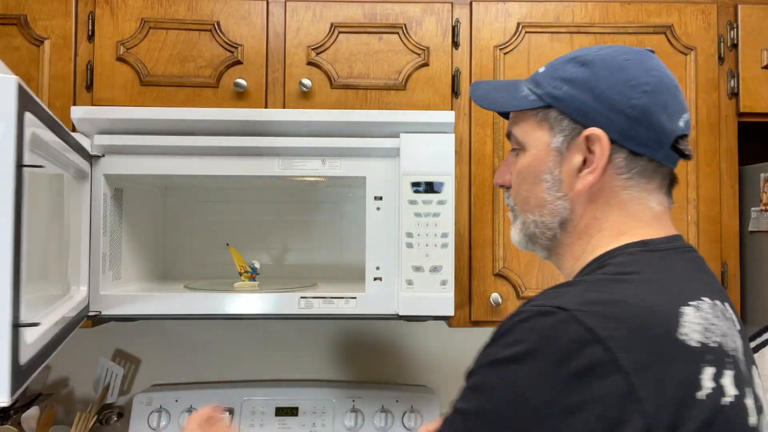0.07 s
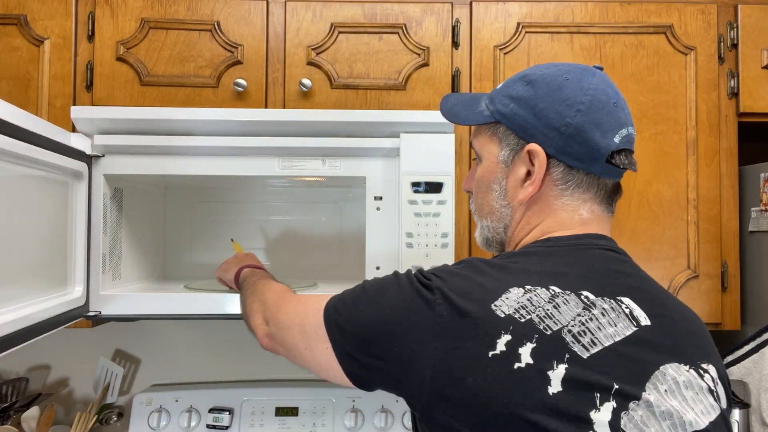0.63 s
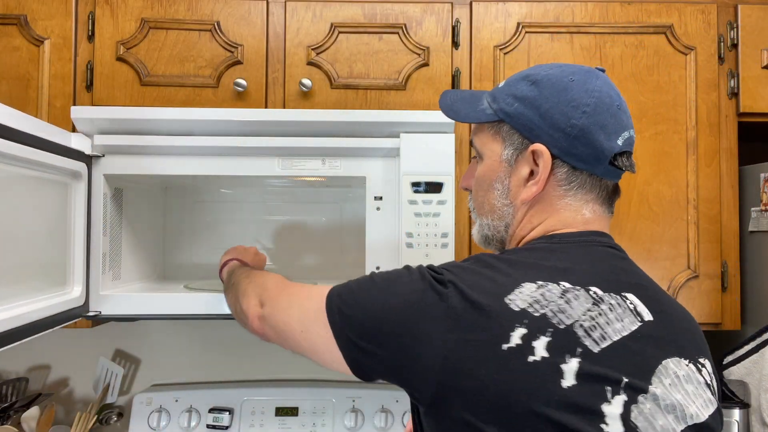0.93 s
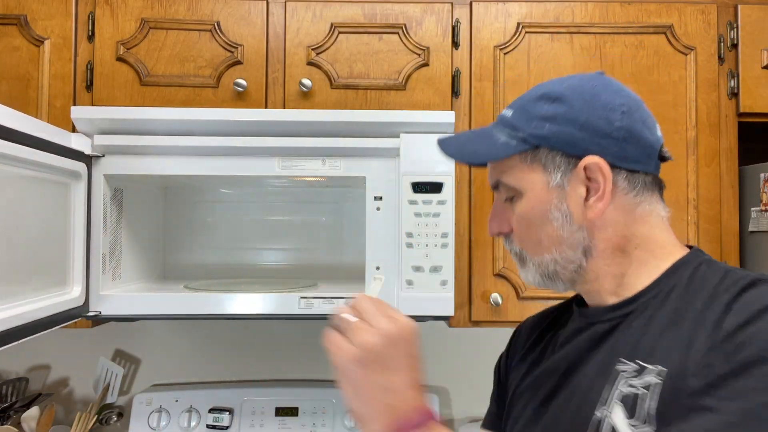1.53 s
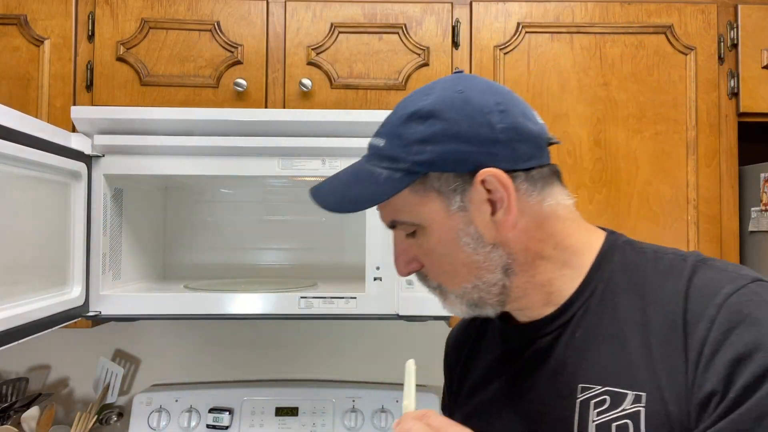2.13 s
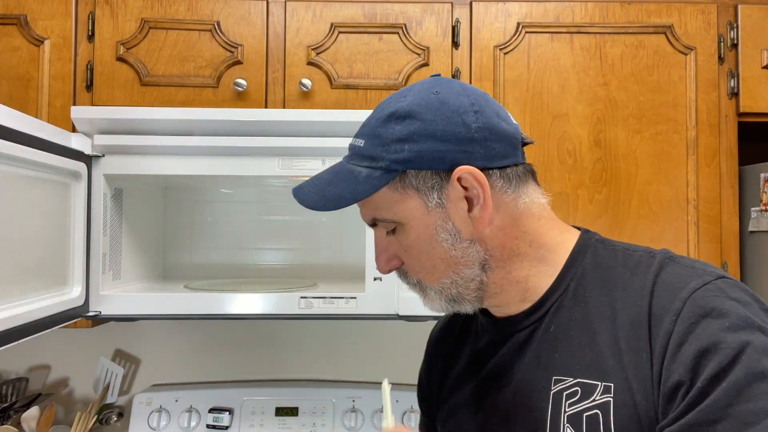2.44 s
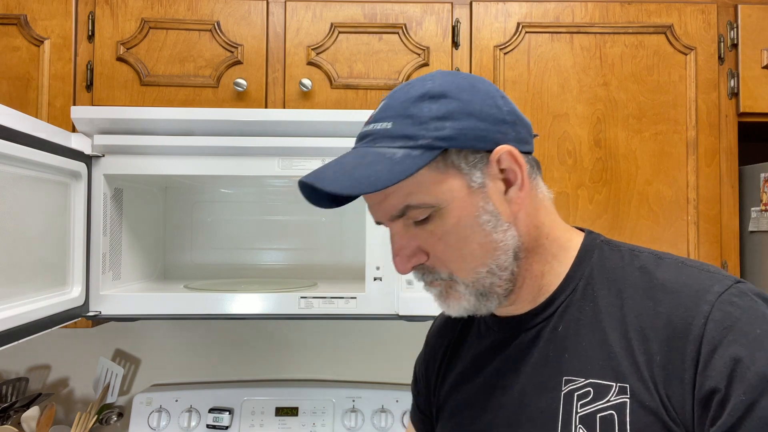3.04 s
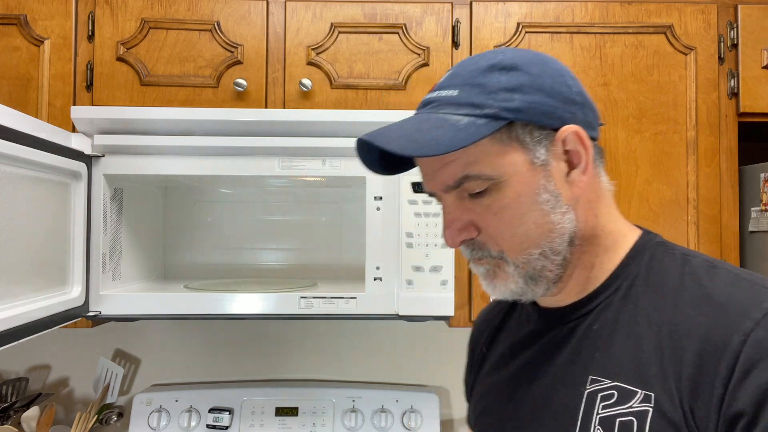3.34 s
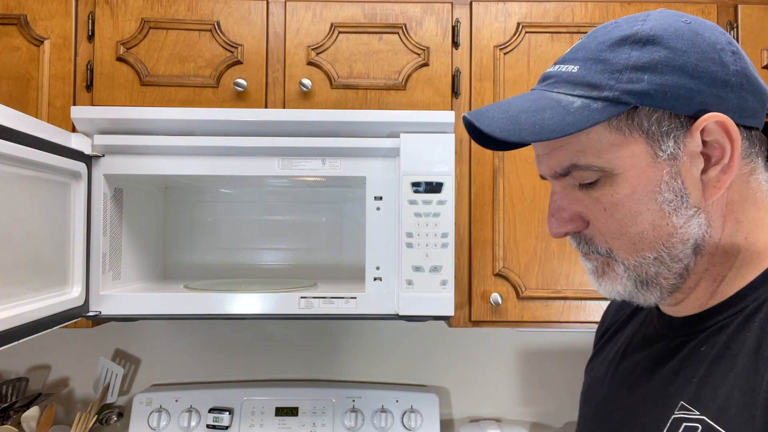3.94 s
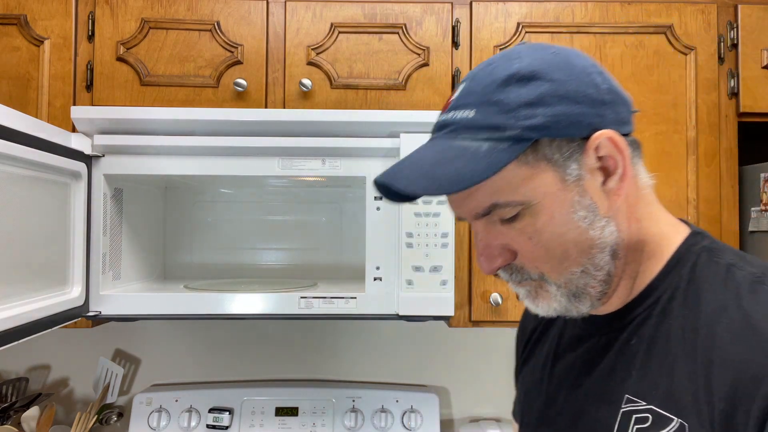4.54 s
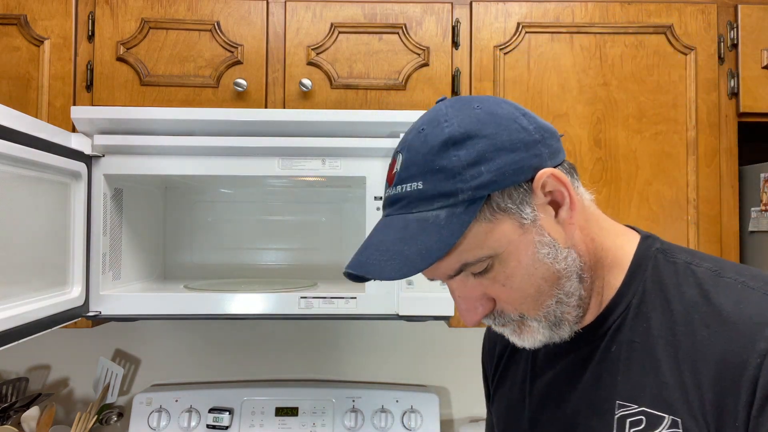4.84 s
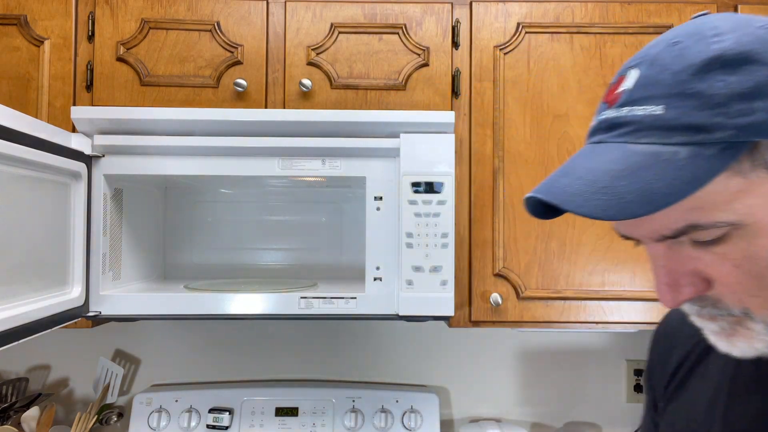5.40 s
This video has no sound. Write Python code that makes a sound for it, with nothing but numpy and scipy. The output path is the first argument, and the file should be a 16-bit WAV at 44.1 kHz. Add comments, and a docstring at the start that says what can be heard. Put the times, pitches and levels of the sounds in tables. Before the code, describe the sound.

A sleeve rustles at the start, over the faint hum of an appliance in a quiet kitchen. From about 0.5 seconds a small toy figure scrapes and nudges the glass turntable of an open microwave, with a tiny squeak near 0.8. At 1.1 the plate drops back with a sharp clink and rings on, one wavering tone fading over the next couple of seconds. The toy clacks sharply in the hand at about 1.45. Soft, hollow plastic taps with a slight hoot come around 1.7 and again from 2.6 to 2.9. After a lull, something snaps down on the counter at 4.1 and thumps the cabinets. A firm knock follows at 4.4, with a short clatter until 4.6. A few faint bumps and ticks and a light cloth rustle continue to about 5.5 seconds. Everything sounds close, with a little room echo.

```python
"""The glass turntable of an open microwave oven clinks and rings on as a small toy figure is pulled off it.
The figure's base scrapes, squeaks and nudges the plate until it drops back on its rollers, its paired
modes beating. The toy clacks in the hand, a hollow plastic thing is tapped, then things are put down
on the counter with a sharp snap and a few knocks that thump the cabinets. A sleeve rustles and an
appliance hums in the quiet kitchen."""
import sys
import numpy as np
from scipy import signal
from scipy.fft import rfft, irfft
from scipy.io import wavfile
from scipy.ndimage import uniform_filter1d

SR = 44100
rng = np.random.default_rng(int(sys.argv[2]) if len(sys.argv) > 2 else 0)


def wav_out(sig):
    """Save sig, one row per channel (or a flat mono array), as 16-bit PCM at SR to the path in sys.argv[1]."""
    wavfile.write(sys.argv[1], SR, np.round(np.clip(np.atleast_2d(sig).T, -1, 1) * 32767).astype(np.int16))


N = 245537

# modes of the glass plate: (frequency [Hz], clash level [dB], ring level [dB], ring t60 [s],
# beat of the pair [Hz], pan left [dB], lift under the hand [dB], left phase lead [rad])
PLATE_MODES = [(381.3, -21, -18.5, 0.42, 2.5, 8.5, 5.5, -0.3),
               (440, -37.5, -36, 0.81, 7.1, -2.5, -1.5, 0.5), (560, -25.5, -29, 0.67, 5.8, 2, -1.5, 1.9),
               (893, -26, -27.5, 3.56, 1.1, -1, 5.5, .5), (1125, -33, -29.5, 0.84, 13, -7, 2.5, 2.5),
               (1174, -18.5, -38, .45, 9, 4.5, 1, 7), (1260.4, -17.5, -34.5, 1.5, 40, 12.5, 13.5, -7),
               (1623, -17.5, -27, 0.69, 18, -3, -4.5, -0.5), (1860, -33.5, -42, .3, 10, 0.5, -2.5, 0),
               (2167, -32.5, -18, .52, 8.6, 1, 12, 0.5), (2295, -33, -36.5, .42, 14, -4, 16, 2.2),
               (2478, -22, -28, 0.57, 7.8, -2.5, 1, 0.8), (2700, -33, -39, .4, 13, -5.5, -1.5, 4),
               (3268, -23.5, -37, .3, 13, -2.5, 13, -2), (3544, -22.5, -46, 0.19, 17, 0.5, 11.5, 9),
               (4440, -50, -45, .45, 13, 0, 0, -1), (4630, -34.5, -41.5, 0.43, 18, -5, 7, 4.5),
               (5106, -41, -52, .42, 9, -5, -3.5, 3), (5200, -61, -57.5, .3, 9, -1, 15, -6.5),
               (5890, -41.5, -44, 0.39, 3.2, -0.5, -5, 3.5), (6734, -41.5, -45, .3, 13, 6, -1.5, -3),
               (7250, -58.5, -59, .3, 10, 4, 18, -3.5), (7434, -47.5, -58.5, .4, 15, 1, 1, -1.5),
               (8800, -46, -46, .24, 8, 0, 0, 3), (8820, -46.5, -51.5, 0.29, 7, -4.5, 1.5, -3.5),
               (9130, -47.5, -50, 0.41, 16, -2, 16, 4.5), (10800, -49.5, -49.5, .22, 9, -4.5, -0.5, 1),
               (11100, -53.5, -50, .2, 11.1, 2.5, 2.5, -2), (12327, -51, -48, .22, 8.8, -2, 4, -5.5),
               (13250, -55, -49, .16, 8, 2, 3, -2.5)]


def amp(db):
    """Decibels to gain."""
    return 10 ** (np.asarray(db) / 20)


def unit(x):
    """Scales to rms 1."""
    return x / np.sqrt(np.mean(x ** 2) + 1e-20)


def unit_attack(x):
    """Scales a stereo hit to rms 1 over its first 50 ms."""
    return x / np.sqrt(np.mean(x[..., :SR // 20] ** 2, axis=(-2, -1), keepdims=True) + 1e-20)


def curve(points, hz):
    """Reads a table on a log-frequency axis."""
    f, value = np.transpose(points)
    return np.interp(np.log(hz + 1), np.log(f + 1), value)


def pan(pan_db):
    """Left and right gains for a level difference; positive leans left."""
    return amp(pan_db * np.array([[.5], [-.5]]))


def add(mix, s, sound):
    """Mixes a sound in at time s."""
    part = mix[:, max(round(s * SR), 0):][:, :sound.shape[1]]
    part += sound[:, :part.shape[1]]


def mic_pair(x, colour_db=0):
    """Two unrelated signals become a stereo image: narrow in the bass and top, wide in the mids."""
    # stereo likeness: (frequency [Hz], left-right correlation [0-1])
    likeness = [(50, 0.92), (130, 0.39), (280, 0.7), (550, 0.12), (1000, 0.098), (4800, 0.11), (6200, 0.62),
                (7800, .92), (9000, 0.81), (10000, 1), (12000, 1), (16000, .6)]
    size = x.shape[1]
    a, b = rfft(x) * amp(colour_db)
    same = curve(likeness, np.fft.rfftfreq(size, 1 / SR))
    mid, side = a * np.sqrt((1 + same) / 2), b * np.sqrt((1 - same) / 2)
    return irfft([mid + side, mid - side], size)


def noise(colour):
    """Stereo noise of a given colour."""
    return unit(mic_pair(rng.standard_normal((2, N)), curve(colour, np.fft.rfftfreq(N, 1 / SR))))


def contact(contact_s, direct_db, near_db, near_t60, size=32768):
    """One contact as heard in the kitchen: the crack, quick echoes off nearby surfaces, then the tail."""
    # kitchen reverb: (frequency [Hz], t60 [s])
    room_t60 = [(100, 0.45), (400, 0.58), (1000, 0.51), (2800, 0.57), (7300, 0.46), (15000, 0.26)]
    t = np.arange(size) / SR
    hz, frame_s, bands = signal.stft(rng.standard_normal((2, size)), SR, nperseg=256)
    decay = amp(-60 * frame_s / curve(room_t60, hz)[:, None])
    tail = signal.istft(bands * decay, SR, nperseg=256)[1][:, :size]
    tail *= 1 - np.exp(-t / 0.00023)
    echoes = rng.standard_normal((2, size)) * (rng.random(size) < .08) * amp(-60 * t / near_t60)
    crack = rng.standard_normal((2, size)) * np.exp(-t / contact_s)
    spectrum = rfft(unit(tail) + amp(near_db) * unit(echoes) + amp(direct_db) * unit(crack))
    spectrum /= np.sqrt(uniform_filter1d(abs(spectrum) ** 2, size=160))  # fine ripples, no broad colour
    fade_out = np.minimum((t[-1] - t) * 10, 1) ** 2
    return mic_pair(irfft(spectrum)) * fade_out


def body_response(db, size=8192):
    """Minimum-phase impulse response of a gain curve: the body rings only after the blow."""
    log_gain = np.log(amp(np.maximum(db - db.max(), -90)))
    mirrored = np.concatenate([log_gain, log_gain[-2:0:-1]])
    return np.fft.ifft(np.exp(np.conj(signal.hilbert(mirrored)))).real[:size]


def knocks(hits, colour, modes, direct_db, near_db, near_t60, pan_db=0):
    """Blows on one body: each tilts its colour brighter or duller and rings its resonances."""
    hz, out = np.fft.rfftfreq(16384, 1 / SR), np.zeros((2, N))
    peaks = sum((amp(db) - 1) / (1 + (2 * (hz - f) / width) ** 2) for f, width, db in modes)
    body_db = curve(colour, hz) + 20 * np.log10(np.maximum(1 + peaks, 1e-3))
    octaves = np.log2(np.maximum(hz, 450))
    for s, db, tilt_db, contact_s in hits:
        ring = body_response(body_db + tilt_db * octaves)
        strike = contact(contact_s, direct_db, near_db, near_t60)
        add(out, s, amp(db) * unit_attack(signal.fftconvolve(strike, ring[None], axes=1)))
    return out * pan(pan_db)


def room_tone(air_db=-57, rumble_db=-55):
    """Still air, an appliance motor's hum and a low rumble that swells as the person shifts."""
    # colours of the air and the rumble: (frequency [Hz], level [dB])
    air = [(76, -30.5), (130, -7.5), (360, -0.5), (580, -10.5), (1240, -16.5), (2200, -17), (4500, -24),
           (8500, -24), (11400, -21), (16000, -41)]
    rumble = [(20, -22), (38, -13.5), (52, 6.5), (75, -6.5), (110, -10), (160, -14.5), (400, -17),
              (700, -21), (2000, -60)]
    # motor tones: (frequency [Hz], level [dB])
    motor = [(53.6, -55), (107.4, -60.5), (183, -68.5), (420, -65.5), (635.2, -73)]
    # body shifts: (centre time [s], half length [s], level [dB])
    shifts = [(0.549, 0.43, -40), (1.27, 0.1, -50), (1.851, 0.13, -48), (4.601, 0.3, -46),
              (5.35, 0.16, -45.5)]
    t = np.arange(N) / SR
    hum = sum(amp(db) * np.sqrt(2) * np.sin(2 * np.pi * (hz * t + rng.random())) for hz, db in motor)
    swells = sum(amp(db) * np.exp(-((t - s) / half) ** 2) for s, half, db in shifts)
    return amp(air_db) * noise(air) + (amp(rumble_db) + swells) * noise(rumble) + hum


def sleeve(grain_db=0.9):
    """Cloth catches and slips in uneven little rushes as each sweep of the arm speeds up and slows."""
    # cloth colour: (frequency [Hz], level [dB])
    cloth = [(88, -11.5), (150, -15.5), (420, -2), (560, -12.5), (1120, -10), (1550, -13.5), (1950, -7.5),
             (2500, -17), (4200, -18.5), (5000, -11.5), (5700, -23), (6450, -15), (7000, -18.5),
             (10500, -19.5), (13000, -24), (16000, -30)]
    # arm sweeps: (peak time [s], level [dB], 20 dB rise [s], 20 dB fade [s])
    sweeps = [(.06, -38, 1, 0.53), (0.849, -51, 0.23, 0.44), (5.05, -65, 0.1, 0.93),
              (5.5, -54.5, 0.69, 0.4)]
    t = np.arange(N) / SR
    power = sum(amp(db - 20 * np.maximum((s - t) / rise, (t - s) / fade)) ** 2
                for s, db, rise, fade in sweeps)
    catches = unit(uniform_filter1d(rng.standard_normal(N), size=300))
    return noise(cloth) * np.sqrt(power) * amp(grain_db * catches)


def cabinet_thumps(rise_cycles=0.77):
    """Low, damped swings of cabinets and counter; the deeper a mode, the slower it gets going."""
    # low modes of the counter and its cabinet: (frequency [Hz], level [dB], t60 [s])
    modes = [(55.5, -22, 0.45), (104, -24, 0.39), (171, -22.5, 0.2), (211.5, -19.5, 0.53), (248, -31, 0.35),
             (314.5, -8.5, 0.14)]
    # blows heavy enough to swing them: (time [s], level [dB])
    blows = [(4.1336, -1.5), (4.4219, -15)]
    # soft bumps against oven and cupboards: (time [s], level [dB], frequency [Hz], t60 [s])
    bumps = [(0.483, -22, 96, 0.11), (0.897, -24, 52, 0.22), (1.085, -35.5, 80, 0.89),
             (1.704, -27.5, 95.4, 0.14), (4.577, -25, 66.3, 0.11), (5.13, -17, 57.7, 0.18),
             (5.222, -20.5, 87.5, 0.063), (5.375, -44.5, 286, 0.35)]
    t, out = np.arange(SR // 2) / SR, np.zeros((2, N))
    heavy = [(s, db + mode_db, hz, t60) for s, db in blows for hz, mode_db, t60 in modes]
    for s, db, hz, t60 in heavy + bumps:
        envelope = amp(db - 60 * t / t60) * (1 - np.exp(-t * hz / rise_cycles))
        add(out, s, (envelope * np.sin(2 * np.pi * hz * t))[None])
    return out * pan(1.5)


def plastic_ticks():
    """Light contacts on plastic give tiny, bright, close ticks."""
    # tick colour: (frequency [Hz], level [dB])
    colour = [(500, -42), (3000, 7), (6000, 2.5), (8300, 3.5), (12000, -1), (16000, -13)]
    # resonances: (frequency [Hz], width [Hz], lift [dB])
    modes = [(10450, 670, 7), (14600, 550, 12)]
    # ticks: (time [s], level [dB], tilt [dB/octave], contact time [s])
    hits = [(1.442, -33.5, 3.5, 0.016), (1.668, -47, 4, 0.0019), (1.694, -47.5, 0.5, .006),
            (4.546, -43, -9.5, 0.00094), (4.572, -49, 1, 0.00078), (5.1645, -50.5, -8, 0.0018)]
    return knocks(hits, colour, modes, direct_db=6.0, near_db=-4.0, near_t60=0.36)


def hollow_taps(t60=0.34, rise_s=0.014, settle_s=0.073, left_lead_rad=1.0):
    """A hollow plastic thing clacks and the air inside hoots, its note sliding as the grip shifts."""
    # wall colour: (frequency [Hz], level [dB])
    colour = [(110, -53), (200, -9), (450, -2), (700, -8.5), (1000, -12), (1400, -18.5), (1850, -20.5),
              (3400, -35), (4200, -37.5), (9000, -63), (16000, -91)]
    # resonances: (frequency [Hz], width [Hz], lift [dB])
    modes = [(292, 49, 4.4), (569, 52, 7.7), (874, 63, 8.8), (1167, 22, 9), (1360, 53, 8.7),
             (1613, 20, 8.5), (2306, 46, 10.6), (3000, 40, 11), (3320, 50, 14)]
    # taps: (time [s], level [dB], tilt [dB/octave], hoot pitch [Hz], hoot level [dB], slide [Hz])
    taps = [(1.674, -42, 3, 519.6, -32.5, -2), (1.714, -34.5, 3, 440.5, -29.5, 3),
            (1.748, -41, 7, 495, -33.5, 23.5), (2.594, -41, 0, 543, -34, -29),
            (2.753, -47, 1, 539, -46, -23), (2.792, -40.5, 1, 412, -31, 71.5),
            (2.853, -54, -8, 505, -37, -33.5)]
    # it never lands flat, so a graze, the blow, two dull rebounds:
    # (delay [s], level [dB], tilt [dB/octave])
    landing = [(-.008, -10.5, 2.5), (0, 0, 0), (.036, -5.5, -5), (.072, -11, -5)]
    contact_s = 0.0077
    hits = [(s + delay, db + step_db, tilt_db + step_tilt, contact_s)
            for s, db, tilt_db, *_ in taps for delay, step_db, step_tilt in landing]
    out = knocks(hits, colour, modes, direct_db=-1, near_db=8.0, near_t60=0.16)
    t = np.arange(SR // 2) / SR
    for s, _, _, hz, db, slide_hz in taps:
        turns = np.cumsum(hz + slide_hz * (1 - np.exp(-t / settle_s))) / SR
        hoot = np.sin(2 * np.pi * turns + np.array([[left_lead_rad], [0]])) * (1 - np.exp(-t / rise_s))
        add(out, s, hoot * amp(db - 60 * t / t60) * pan(3))
    return out


def counter_knocks():
    """Things put down ring the counter top: one firm blow and the clatter after it."""
    # counter colour: (frequency [Hz], level [dB])
    colour = [(35, -71), (60, -21), (217, 1), (458, -0.5), (882, 3), (1510, -5), (2000, -8.5), (2350, -12),
              (2580, -14.5), (8120, -30.5), (11300, -43.5), (16000, -50)]
    # resonances: (frequency [Hz], width [Hz], lift [dB])
    modes = [(342, 68, 8.7), (517, 14, 9.7), (641, 22, 9.5), (880, 40, 4.1), (1610, 9, 6.2),
             (2670, 17, 4.9)]
    # knocks: (time [s], level [dB], tilt [dB/octave], contact time [s])
    hits = [(4.4208, -18.5, 2.04, 0.00047), (4.4425, -23.5, 1, 0.00051), (4.4916, -32.5, 1, 0.00045),
            (4.515, -30, 1, 0.00052), (4.5455, -32.5, 2.5, 0.00028), (4.5645, -29.5, 2, 0.00032),
            (4.571, -28.5, 0.5, 0.0005), (4.83, -41.5, 3.6, 0.046), (5.259, -47.5, 3, 0.00067)]
    return knocks(hits, colour, modes, direct_db=4.0, near_db=4.5, near_t60=0.15)


def piece_snap():
    """A stiff piece snaps down on the counter: a sharp double hit, then two faint, dull ones."""
    # colour of the piece: (frequency [Hz], level [dB])
    colour = [(25, -45), (45, -9.5), (150, -9), (205, -3.5), (265, -1), (345, 0), (450, -8.5), (750, -15),
              (1000, -16), (1550, -15), (1900, -18), (2600, -15), (3550, -14.5), (4050, -20.5), (5050, -14),
              (6900, -22.5), (9500, -24), (12000, -32.5), (16000, -40)]
    # resonances: (frequency [Hz], width [Hz], lift [dB])
    modes = [(209.5, 21, 6.5), (1430, 240, 5.8), (1644, 31, 6.6), (2204, 24, 8.3), (3300, 36, 5.3),
             (3500, 40, 5.7), (4680, 45, 6), (4970, 19, 5.7), (5440, 56, 6.9), (6660, 30, 8.2),
             (7240, 39, 6), (8600, 140, 2.8), (13750, 610, 8)]
    # hits: (time [s], level [dB], tilt [dB/octave], contact time [s])
    hits = [(4.1325, -20, 3, 0.0017), (4.1365, -16.5, -3, 0.0042), (4.221, -36, -3, 0.0032),
            (4.316, -48, -8, 0.0014)]
    return knocks(hits, colour, modes, direct_db=0.5, near_db=5.0, near_t60=0.19, pan_db=-1.0)


def toy_clack():
    """The hard toy figure clacks in the hand: a light touch, then a sharp hit."""
    # toy colour: (frequency [Hz], level [dB])
    colour = [(71, -52), (120, -2), (160, -15), (643, 3.5), (822, -6), (911, -1.5), (1030, -3.5),
              (2640, -15), (5190, -26.5), (7980, -42), (11500, -44), (16000, -67)]
    # resonances: (frequency [Hz], width [Hz], lift [dB])
    modes = [(470, 114, 5.5), (913, 27, 4.2), (2400, 30, 6), (2610, 30, 9), (2970, 110, 6.5),
             (3280, 27, 4.5), (3720, 270, 5.6), (6990, 60, 7), (7770, 140, 7)]
    # clacks: (time [s], level [dB], tilt [dB/octave], contact time [s])
    hits = [(1.4415, -33, 1, 0.0013), (1.4515, -16, 2.5, 0.00067)]
    return knocks(hits, colour, modes, direct_db=-6, near_db=4.5, near_t60=0.16, pan_db=-1.0)


def base_squeak():
    """The figure's base squeaks as it breaks loose from the glass."""
    # squeak colour: (frequency [Hz], level [dB])
    colour = [(500, -50), (2600, -24), (3300, -4), (4100, -1), (5000, -10.5), (6000, -19), (16000, -35)]
    # squeaks: (time [s], level [dB], tilt [dB/octave], contact time [s])
    hits = [(.829, -52.5, -4, .03), (.85, -48.5, 9, 0.024)]
    return knocks(hits, colour, [], direct_db=8, near_db=1, near_t60=0.11)


def damped_plate(width_hz=40):
    """The plate's resonances, broadened by the hand that damps them."""
    return [(hz, width_hz, lift_db) for hz, *_, lift_db, _ in PLATE_MODES]


def base_scrape(light_db=-55, tilt_db=2.0, dulling=0.11, contact_s=0.006, count=12):
    """The base sticks and slips unevenly over the glass: light slips scratch thinly, hard ones duller."""
    # scrape colour: (frequency [Hz], level [dB])
    colour = [(150, -21), (400, -7.5), (720, 5), (950, -10.5), (1250, -6), (1500, -16), (2300, -13.5),
              (2700, -21.5), (4600, -24), (6000, -31.5), (9000, -32.5), (12000, -44), (16000, -56)]
    # drags: (start [s], length [s], starting level [dB], swell [dB])
    drags = [(0.472, 0.11, -55.5, 0.5), (0.859, .056, -46, 6)]
    slips = []
    for start, length, start_db, swell_db in drags:
        along = (np.arange(count) + rng.random(count)) / count
        force_db = start_db + swell_db * np.sin(np.pi / 2 * along)
        slips += [(start + u * length, db, tilt_db - dulling * (db - light_db), contact_s)
                  for u, db in zip(along, force_db)]
    return knocks(slips, colour, damped_plate(), direct_db=-10, near_db=18, near_t60=0.085, pan_db=2)


def plate_nudges():
    """The figure's base knocks the hand-damped plate, and the dense knock of the glass landing back on its
    rollers."""
    # colour of the held plate: (frequency [Hz], level [dB])
    colour = [(150, -33.5), (400, -22), (720, 4), (950, 1), (1280, -3), (1700, -10.5), (2330, -12),
              (2850, -25), (3500, -16), (4300, -33.5), (8000, -40.5), (16000, -63)]
    # nudges, then the landing: (time [s], level [dB], tilt [dB/octave], contact time [s])
    hits = [(.6075, -32.5, -0.5, 0.0045), (1.0775, -19.5, 3, 0.0016)]
    return knocks(hits, colour, damped_plate(), direct_db=-8, near_db=3, near_t60=0.21, pan_db=1)


def plate_clash(t60=0.094, lowest_hz=310):
    """Still in contact, the plate's modes die fast and echo in the metal oven cavity."""
    hz, db, _, _, _, pan_db, _, _ = np.transpose(PLATE_MODES)[:, :, None, None]
    t = np.arange(SR // 3) / SR
    attack = 1 - np.exp(-t * hz / 2)  # each mode builds over a few cycles
    rings = np.sin(2 * np.pi * hz * t) * amp(-60 * t / t60) * attack
    cavity = contact(contact_s=0.0039, direct_db=-3.0, near_db=10.5, near_t60=0.15, size=16384)
    modes = unit_attack(signal.fftconvolve(rings, cavity[None], axes=2))
    clash = np.sum(modes * pan(pan_db) * amp(db), 0) / np.sqrt(2)
    return signal.sosfilt(signal.butter(4, lowest_hz, "high", fs=SR, output="sos"), clash)


def plate_clink(drop_s=1.0775, twin_gain=0.33, twin_lead_rad=1.0, waver=0.3, rock_hz=30, rock_count=8):
    """The plate drops back on its rollers and rings freely; its rocking makes each tone waver."""
    out, left = np.zeros((2, N)), np.array([[1], [0]])
    add(out, drop_s, amp(-2.0) * plate_clash())
    for hz, _, db, t60, beat_hz, pan_db, _, lead in PLATE_MODES:
        t = np.arange(int(1.2 * t60 * SR)) / SR
        rate = rng.uniform(-rock_hz, rock_hz, (rock_count, 2, 1))
        phase = rng.random((rock_count, 2, 1))
        depth = waver * min(hz / 2500, 1)  # short waves feel the rocking most
        rocking = depth * np.exp(2j * np.pi * (rate * t + phase)).sum(0) * np.exp(-t / .5)
        # a round plate's modes come in close pairs that beat
        pair = 1 + twin_gain * np.exp(1j * (2 * np.pi * beat_hz * t + twin_lead_rad * left))
        tone = (np.exp(1j * (2 * np.pi * hz * t + lead * left)) * (pair + rocking)).imag
        envelope = amp(db - 60 * t / t60) * (1 - np.exp(-t / 0.021))
        add(out, drop_s, tone * pan(pan_db) * envelope)
    return out


def scene():
    """Handled things, the glass plate and the kitchen around them."""
    handling = toy_clack() + piece_snap() + counter_knocks() + plastic_ticks()
    plate = plate_clink() + plate_nudges() + base_squeak() + base_scrape()
    return plate + handling + hollow_taps() + cabinet_thumps() + sleeve() + room_tone()


def record(dry, low_cut_hz=35, high_cut_hz=16400, treble_lag_s=0.0002504, ceiling=.95):
    """The microphone pair: low cut, a slight lag in the left treble, rounded peaks, high cut."""
    hz = np.fft.rfftfreq(N, 1 / SR)
    left, right = signal.sosfilt(signal.butter(2, low_cut_hz, "high", fs=SR, output="sos"), dry)
    lag_turns = np.maximum(hz * treble_lag_s - 1, 0)  # in step below about 4 kHz
    left = irfft(rfft(left) * np.exp(-2j * np.pi * lag_turns), N)
    rounded = ceiling * np.tanh(np.array([left, right]) / ceiling)
    high_cut = signal.firwin(255, high_cut_hz, window=("kaiser", 9), fs=SR)
    return signal.oaconvolve(rounded, high_cut[None], "same")


dry = scene()
out = record(dry)
wav_out(out)
```